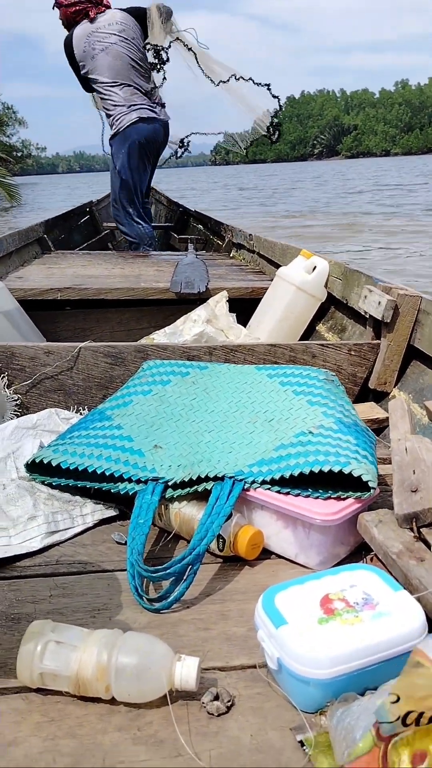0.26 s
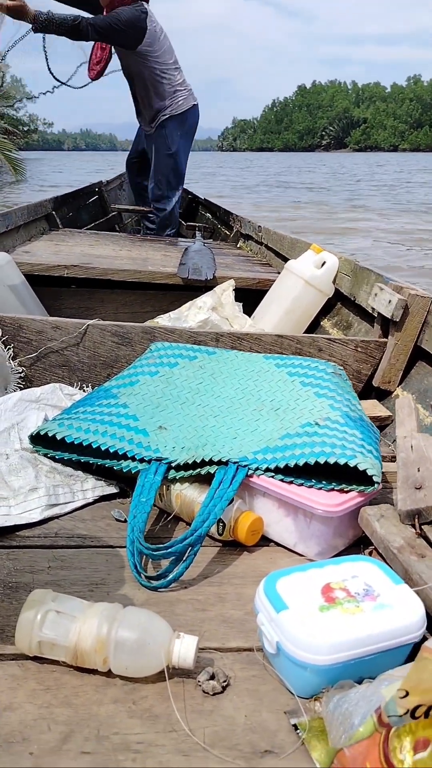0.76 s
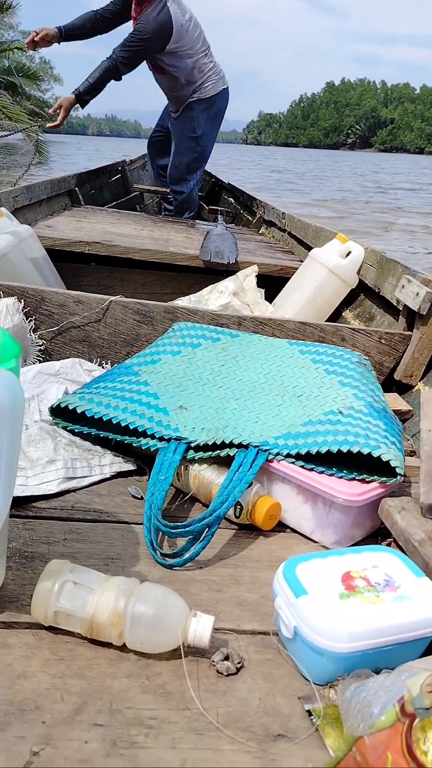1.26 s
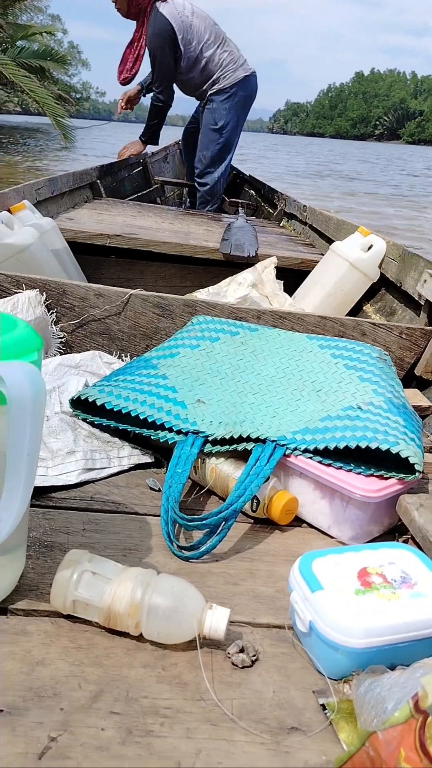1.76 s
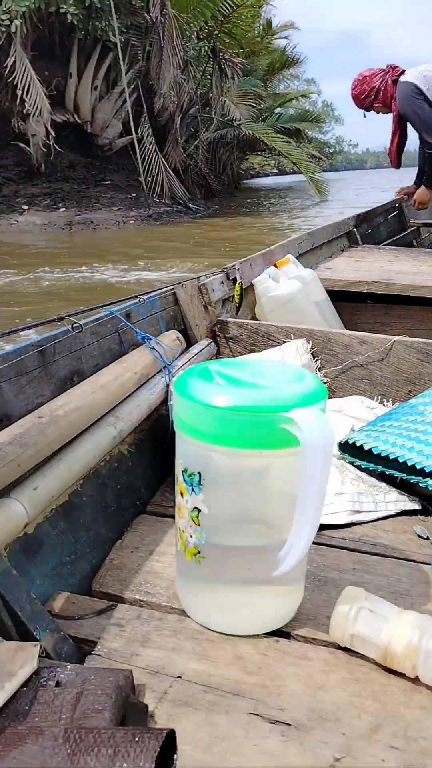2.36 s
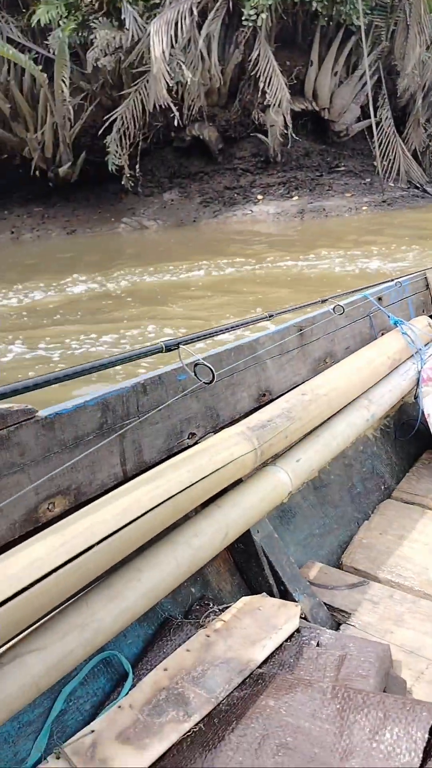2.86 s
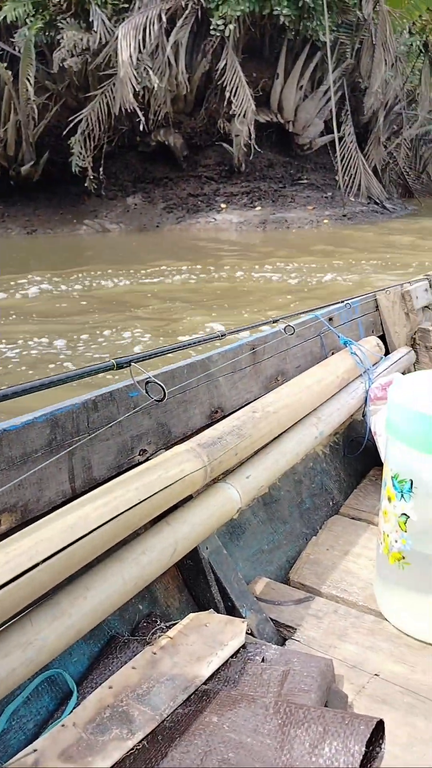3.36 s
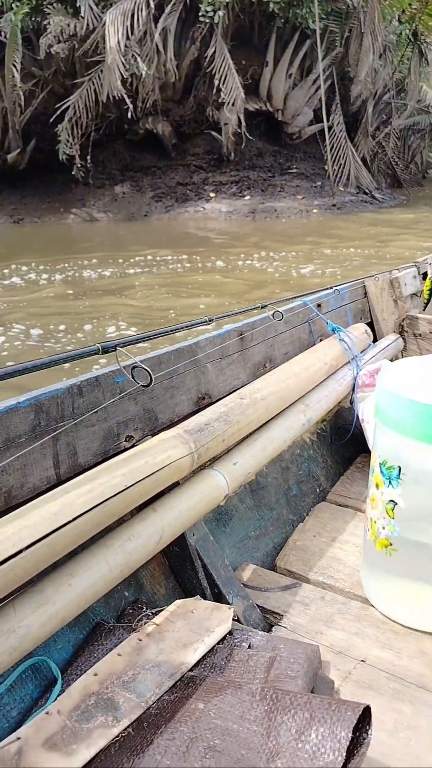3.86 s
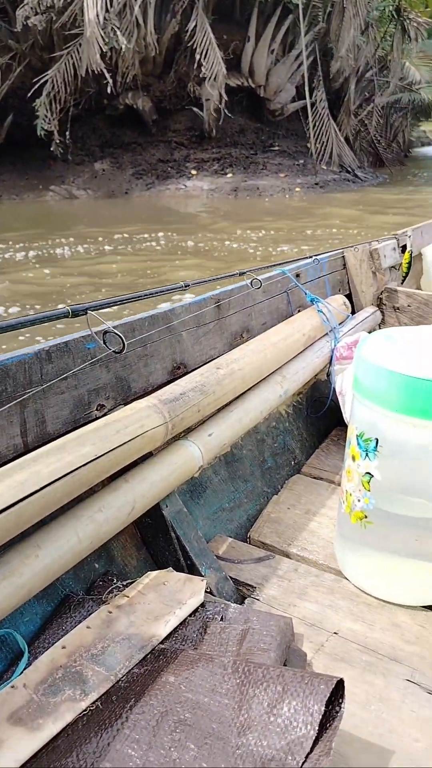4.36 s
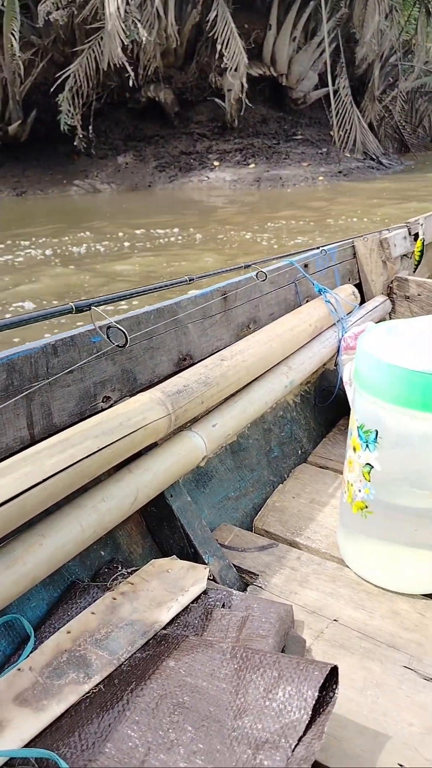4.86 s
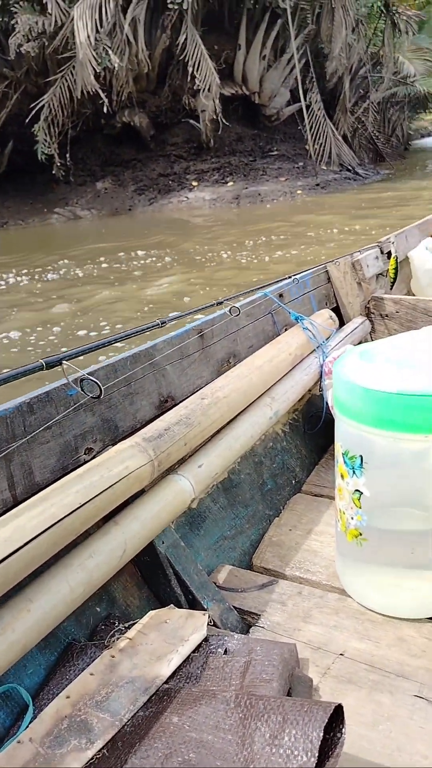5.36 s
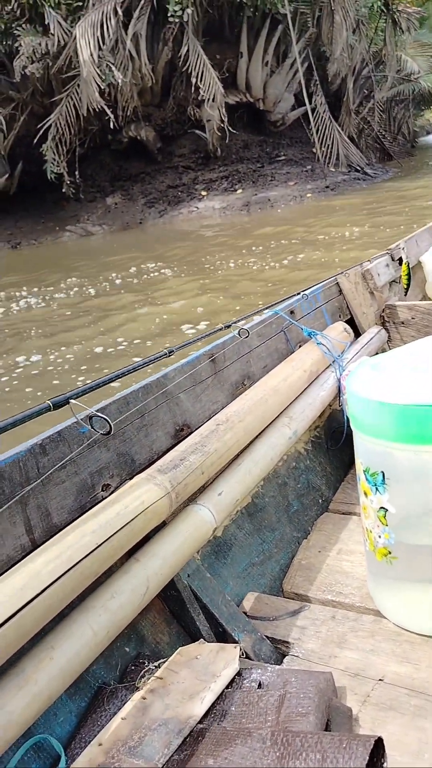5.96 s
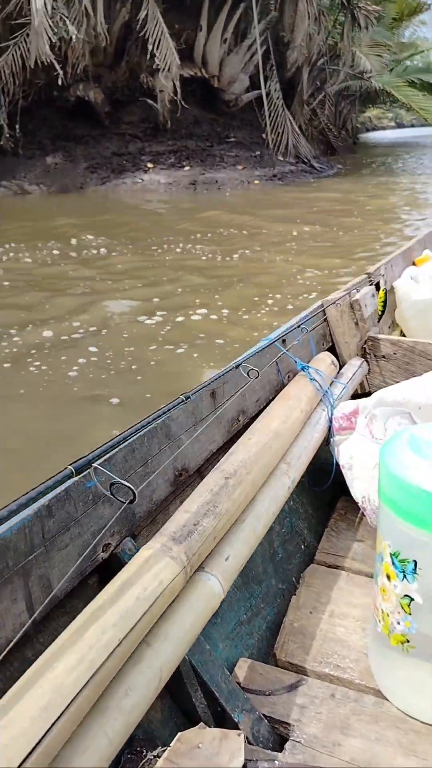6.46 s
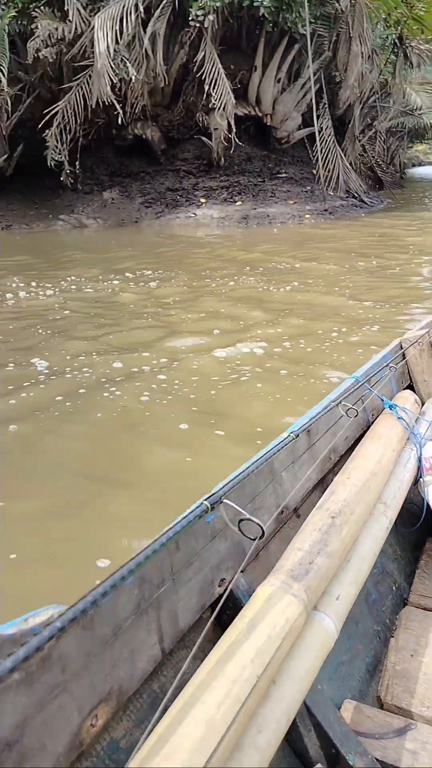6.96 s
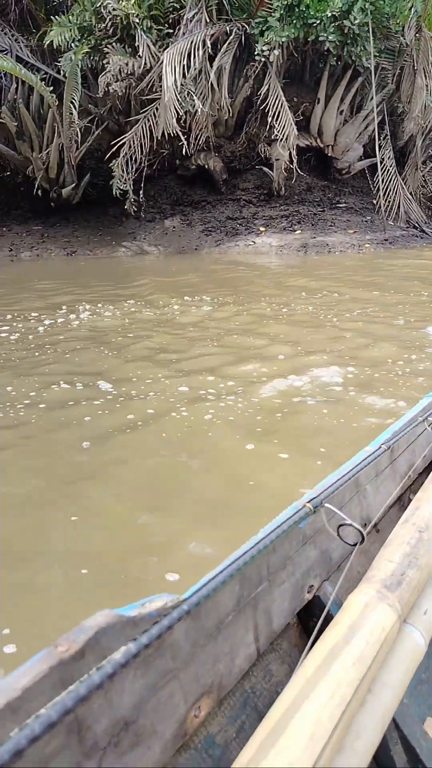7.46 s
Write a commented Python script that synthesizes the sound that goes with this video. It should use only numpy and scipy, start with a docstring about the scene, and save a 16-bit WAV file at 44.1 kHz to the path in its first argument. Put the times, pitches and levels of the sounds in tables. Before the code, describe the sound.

A weighted net clatters hard over a wooden boat, hisses through the air and splashes into the river, then wind buffets and gear knocks follow.

```python
"""Cast net thrown from a wooden boat

The net's weights clatter over the hull as ringing modes and noise bursts; mesh hisses through the air.
It lands in a splash of clicks and ringing bubbles, and large drops plop with a rising pitch.
Filtered, lumpy noise makes the gusts on the microphone, the hull's rumble, dragged gear and the quiet
river; gear knocks and ticks on the planks, and single puffs push at the microphone."""
import sys
import numpy as np
from scipy import signal
from scipy.fft import rfft, irfft, next_fast_len
from scipy.io import wavfile
from scipy.ndimage import uniform_filter1d

SR = 44100
rng = np.random.default_rng(int(sys.argv[2]) if len(sys.argv) > 2 else 0)


def unload_audio(sound):
    """Save the sound as a 16-bit wav file, at the path given as the first command line argument."""
    columns = np.transpose(np.atleast_2d(sound))
    # keep every value between -1 and 1, then stretch to whole-number steps
    steps = np.round(np.clip(columns, -1, 1) * 32767)
    wavfile.write(sys.argv[1], SR, steps.astype(np.int16))


N = 340452  # length [samples]

# Quiet of the river, distant water and leaves: (frequency [Hz], relative level [dB])
RIVER_SPECTRUM = [(200, 1.5), (400, -13), (1000, -9.5), (1350, -10), (1650, -14.5), (2500, -14),
                  (4000, -15.5), (5200, -20.5), (6500, -19.5), (8100, -17), (8700, -32), (11000, -31),
                  (12200, -25.5), (16000, -27)]
RIVER_DB = -62.5

# Gusts on the microphone: (top time [s], top level [dB], 20 dB rise [s], 20 dB fall [s])
GUST_SWELLS = [(0.0, -27, .1, 0.34), (0.3, -49, 0.12, 0.039), (0.48, -26.5, 0.024, 0.14),
               (0.8, -34.5, 0.29, 0.073), (1.2, -47, 0.19, 0.093), (3.5, -27.5, 0.33, 0.21),
               (3.809, -32, 0.54, 0.04), (4.509, -30, 0.13, 0.32), (4.82, -33.5, 0.085, 0.1),
               (5.424, -31, 0.27, 0.31), (5.965, -23.5, 0.069, 0.059), (6.25, -38.5, 0.069, 0.031),
               (6.84, -38, 0.23, 0.13), (7.42, -42, 0.24, 0.63), (7.67, -40, 0.057, 0.013)]
# Breeze between the gusts, before its flutter: (time [s], level [dB])
BREEZE_LEVEL = [(0, -56), (1.9, -50.5), (2.6, -56), (3.9, -98), (4.3, -49), (6.1, -63), (7.72, -55)]
# Colour of wind on the microphone: (frequency [Hz], relative level [dB])
GUST_SPECTRUM = [(8.8, -53), (15, 3), (59, -8), (79, -2), (168, -16), (219, -22), (258, -40), (880, -120)]
FLUTTER_PER_S, FLUTTER_DB = 2.79, 9.5  # the breeze comes and goes

# Hull rumbles as weight shifts in the boat: (top time [s], top level [dB], length [s])
LURCH_SWELLS = [(0.261, -41.5, 0.055), (0.57, -20, 0.2), (0.874, -42, 0.16), (3.444, -53, 0.51),
                (3.998, -47, 0.62), (4.483, -33.5, 0.27), (4.925, -39, 0.22), (5.606, -27.5, 0.13),
                (6.35, -41, 0.32), (6.485, -37, 0.077), (6.629, -41.5, 0.1), (6.795, -39.5, 0.056),
                (6.968, -40, 0.22), (7.601, -37.5, 0.023)]
# Colour of the hull's rumble: (frequency [Hz], relative level [dB])
RUMBLE_SPECTRUM = [(70, -42), (110, 5.5), (150, 0), (240, -3.5), (330, -11.5), (500, -18), (900, -44)]
LURCH_RISE, HUM_DB = 0.25, -55  # share of the length spent rising; the hum between lurches

# Hiss of the net swung back, then in flight: (time [s], level [dB])
SWING_LEVEL = [(0.2, -76), (0.44, -59.5), (0.75, -59), (1.32, -62.5)]
# Jerks of the net, each a burst of hiss: (top time [s], top level [dB])
NET_JOLTS = [(0.46, -47), (0.559, -45), (0.672, -44)]
# Colour of wet mesh in the air: (frequency [Hz], relative level [dB])
MESH_SPECTRUM = [(5000, -23.5), (8500, -23), (8990, -31), (9680, -15.5), (11000, -14.5), (13500, -17.5),
                 (15100, -21), (16000, -31)]
JOLT_RISE_S, JOLT_FALL_S = 0.079, 0.04  # each over 20 dB

# Tiny dry ticks of line and gear: (time [s], peak level [dB])
GEAR_TICKS = [(0.432, -47), (1.51, -41), (2.716, -48), (4.065, -48), (5.85, -45), (6.145, -49), (7.02, -50),
              (7.085, -43), (7.158, -54)]

# Gear dragged over the planks:
# (top time [s], dull level [dB], treble level [dB], 20 dB rise [s], 20 dB fall [s])
GEAR_DRAGS = [(0.475, -48.5, -79, 0.037, 0.99), (0.68, -36, -65, 0.14, 0.12),
              (4.451, -49.5, -69.5, 0.049, 0.27), (5.3, -53.5, -60.5, 0.26, 0.72),
              (6.35, -57.5, -100, 0.43, 0.13), (7.45, -57, -66, 1, 0.75)]
# Dull part of the dragging: (frequency [Hz], relative level [dB])
SCRAPE_SPECTRUM = [(180, -38), (300, 6.5), (432, 2), (504, -3.5), (652, -8), (692, -2), (1310, -8),
                   (1900, -12), (2300, -11), (4500, -23), (11000, -120)]
# Bright part of the dragging: (frequency [Hz], relative level [dB])
RUSTLE_SPECTRUM = [(2350, -27), (4000, 9), (5670, 0), (6440, 4.5), (7790, 8), (8850, -6), (10600, -3),
                   (12200, 1), (15100, -3), (16000, 1)]

# Blows on the boat:
# (time [s], plank level [dB], hull thud peak [dB], edge crack peak [dB], thud centre [Hz])
BLOWS = [(0.467, -11, -22, -25, 300), (0.522, -11.5, -24.5, -22.5, 335), (0.538, -11.5, -20, -18, 248),
         (0.549, -7.5, -2, -21, 293), (0.58, -16, -9.5, -26.5, 262), (0.615, -13.5, -14.5, -20.5, 265),
         (0.625, -37, -10.5, -51, 276), (0.666, -7.5, -22, -18.5, 270), (0.676, -24, -12.5, -26.5, 270),
         (0.718, -47, -20.5, -34, 176), (0.904, -19.5, -32.5, -31, 370), (1.021, -62, -77, -32.5, 196),
         (1.086, -38.5, -42.5, -45, 210), (1.125, -21, -33, -69, 190), (1.176, -59, -27.5, -51, 179),
         (2.136, -24, -34.5, -41, 183), (2.283, -39.5, -34, -60, 196), (2.649, -69, -28.5, -77, 168),
         (3.047, -37.5, -37, -41, 544), (3.959, -37.5, -37.5, -47, 310), (4.37, -51, -75.5, -40, 196),
         (4.412, -34.5, -51, -43, 206), (4.56, -37.5, -47.5, -42, 238), (4.586, -35.5, -33.5, -44, 214),
         (4.668, -27, -36.5, -34.5, 182), (4.696, -22.5, -29.5, -34.5, 390),
         (4.717, -35.5, -42, -41, 182.3), (4.774, -38.5, -36, -61, 394), (4.892, -66, -26.5, -81, 174),
         (5.058, -37.5, -32.5, -41.5, 495), (5.4, -28.5, -34.5, -37, 166), (5.456, -18, -35, -35.5, 200),
         (5.503, -35.5, -51, -50, 300), (5.574, -36, -29, -56, 298), (5.607, -30, -29.5, -42, 316),
         (5.631, -17.5, -32, -26.5, 198), (5.776, -38, -34.5, -46, 483), (5.987, -28.5, -32, -43, 320),
         (6.364, -34, -32, -39, 490), (6.408, -28.5, -35, -49, 206), (6.494, -40.5, -32.5, -65, 215),
         (6.601, -31, -43.5, -50, 159), (6.773, -44, -41, -68, 206), (6.945, -43, -34.5, -65, 242),
         (6.971, -38.5, -34.5, -45, 295), (7.391, -39, -45.5, -67, 370), (7.42, -31.5, -42, -33.5, 408),
         (7.457, -14.5, -27, -28, 544), (7.544, -66, -62, -43, 167), (7.586, -24, -36, -35, 387)]
# Ringing modes of the hull: (frequency [Hz], relative level [dB], 60 dB decay [s])
HULL_MODES = [(133.6, 1, 0.51), (174.9, 7, 0.14), (202.7, -1.5, 0.25), (282, 4, 0.1), (307, 3, 0.014),
              (385, 7, 0.086), (420, -11, 0.061), (523, 18.5, 0.021)]
# Ringing modes of the planks, before random shifts: (frequency [Hz], relative level [dB], 60 dB decay [s])
PLANK_MODES = [(887, -12.5, .055), (1110, -1, 0.0063), (1140, -12.5, 0.02), (1233, -13, 0.075),
               (1424, -21.5, 0.076), (1633, -23, 0.055), (1920, -19, 0.027), (2430, -20, 0.035)]
# Dense modes of loose boards: (frequency [Hz], relative level [dB])
BOARD_SPECTRUM = [(300, 13.5), (500, 3), (900, 4), (1400, 1), (1700, -15.5), (2400, -16)]
# Dense high modes of hard edges: (frequency [Hz], relative level [dB])
EDGE_SPECTRUM = [(1200, -33.5), (1600, -3), (1900, 6.5), (2450, 5), (3500, 0.5), (4600, -4), (5400, -10.5),
                 (7000, -9.5), (8200, -18), (9000, -18), (10500, -17.5), (15800, -24.5)]
CONTACT_S, CONTACT_S_PER_DB = .0115, .0003  # contact time of a -30 dB thud; heavier thuds press longer

# Single large drops, in the splash and dripping later: (time [s], level [dB], starting pitch [Hz])
DROPS = [(1.285, -42.5, 660), (1.389, -31, 590), (1.548, -35, 870), (1.607, -27, 1180), (1.712, -31, 1060),
         (1.778, -35, 950), (1.917, -36, 816), (2.03, -32, 1190), (2.054, -27, 2120), (2.074, -32, 850),
         (2.202, -44, 980), (2.242, -46, 940), (2.356, -42, 1120), (2.559, -45, 2070), (3.694, -42, 2200),
         (7.245, -42.5, 2800), (7.305, -43, 503), (7.553, -41, 1990), (7.672, -46, 1040)]
RING_CYCLES = 40  # a drop's bubble dies by 60 dB in this many cycles of its starting pitch

# Net landing on the water: (time [s], splash level [dB], fine spray above it [dB])
SPLASH_LEVEL = [(1.32, -58.5, 7.5), (1.4, -40.5, -14.5), (1.52, -39, -3), (1.55, -32, -16.5),
                (1.84, -43, -13), (2.14, -47.5, -13.5), (2.2, -56, -8.5), (2.75, -72, -6)]
# Body of the splash: (frequency [Hz], relative level [dB])
WATER_SPECTRUM = [(120, -49), (200, 3), (378, 5), (535, -7.5), (632, 2.5), (726, -6.5), (870, 2.5),
                  (1210, 0.5), (1560, -10), (2030, -4.5), (2830, -15), (3200, -14.5), (5500, -22.5),
                  (7150, -25), (12100, -120)]
# Fine spray: (frequency [Hz], relative level [dB])
SPRAY_SPECTRUM = [(2650, -13), (4500, -21.5), (5620, -28.5), (6700, -21), (7980, -23.5), (8640, -32.5),
                  (13200, -27.5), (15100, -29), (16000, -28)]

# Single strong puffs of wind on the microphone: (time [s], level [dB], pitch [Hz])
WIND_PUFFS = [(1.764, -28.5, 50), (1.861, -26.5, 50.3), (3.437, -27.5, 72), (3.495, -19.5, 93),
              (3.508, -25, 92), (3.523, -31, 65), (3.614, -16, 66), (3.641, -18.5, 70), (3.707, -18, 70),
              (3.814, -19, 33.9), (4.484, -26, 100), (4.513, -19, 66.4), (4.596, -16, 63),
              (4.618, -18.5, 66), (4.788, -15.5, 60), (5.407, -19, 65.4), (5.428, -17, 75),
              (5.438, -23, 71), (5.463, -21, 59.5), (5.76, -24, 64), (5.796, -17.5, 83), (5.826, -23, 56.4),
              (5.943, -24.5, 77.5), (6.625, -26, 79)]

BAND_LIMIT_HZ = 16000


def gain_of(db):
    """Turns decibels into a factor."""
    return 10 ** (np.asarray(db) / 20)


def evened(x):
    """Scales to rms 1."""
    return x / np.sqrt(np.mean(x ** 2) + 1e-20)


def peaked(x):
    """Scales to peak 1."""
    return x / abs(x).max()


def level(rows, column=1):
    """Gain along a curve, practically silent outside its span."""
    rows = np.asarray(rows)
    db = np.interp(np.arange(N) / SR, rows[:, 0], rows[:, column], left=-140, right=-140)
    return uniform_filter1d(gain_of(db), size=200)


def swells(tops, dbs, rises, falls):
    """Gain of swells that climb 20 dB in rise s to their top and drop 20 dB in fall s."""
    coarse = np.arange(0, N, 64)
    t = coarse / SR - np.asarray(tops)[:, None]
    dbs, rises, falls = (np.broadcast_to(v, len(t))[:, None] for v in (dbs, rises, falls))
    slope = np.where(t < 0, -t / np.maximum(rises, .01), t / np.maximum(falls, .01))
    return np.interp(np.arange(N), coarse, gain_of(dbs - 20 * slope).sum(axis=0))


def wander(per_s, depth_db):
    """Gain that drifts between random levels, per_s of them a second."""
    knots = rng.standard_normal(N // 20)
    drift = np.interp(np.arange(N) * per_s / SR, np.arange(len(knots)), knots)
    return gain_of(depth_db * drift)


def lumpy(per_s, depth_db):
    """Noise whose level wanders about per_s times a second."""
    return wander(per_s, depth_db) * rng.standard_normal(N)


def clicks(per_s, spread_db):
    """A random train of clicks, a few much larger than the rest."""
    size = gain_of(spread_db * np.minimum(rng.exponential(1, N), 4))
    sign = rng.choice([-1, 1], N)
    return size * sign * (rng.random(N) < per_s / SR)


def coloured(x, spectrum):
    """Filters x by a spectrum of (frequency [Hz], level [dB]) points, rms 1."""
    hz, db = np.transpose(spectrum)
    size = next_fast_len(len(x))
    bins = np.fft.rfftfreq(size, 1 / SR)
    shape = gain_of(np.interp(np.log(bins + 1), np.log(hz), db, left=-90, right=-90))
    return evened(irfft(rfft(x, size) * shape, size)[:len(x)])


def steadied(x, span_s):
    """Takes the slow chance swells out of x and keeps the quick lumps."""
    power = abs(uniform_filter1d(x ** 2, int(span_s * SR)))
    return evened(x / np.sqrt(power + 0.17))


def patchy(x, depth_db, size):
    """Gives x random bright and dull patches, size (bins, frames) large."""
    z = signal.stft(x, nperseg=512)[2]
    patches = uniform_filter1d(rng.standard_normal(z.shape), size=size[0], axis=0)
    patches = evened(uniform_filter1d(patches, size=size[1], axis=1))
    return evened(signal.istft(z * gain_of(depth_db * patches), nperseg=512)[1][:N])


def river():
    """Distant water and leaves: a hiss with faint drifting patches."""
    hiss = coloured(lumpy(25, 1.3), RIVER_SPECTRUM)
    return gain_of(RIVER_DB) * patchy(hiss, 1.9, size=(8, 14))


def gusts():
    """Lumpy pressure swings of wind at the microphone port, gusts over a fluttering breeze."""
    breeze = level(BREEZE_LEVEL) * wander(FLUTTER_PER_S, FLUTTER_DB)
    blowing = breeze + swells(*np.transpose(GUST_SWELLS))
    return steadied(coloured(lumpy(22, 5.5), GUST_SPECTRUM), .12) * blowing


def rumble():
    """The hull hums low under ripples and feet and swells as weight shifts."""
    tops, dbs, lengths = np.transpose(LURCH_SWELLS)
    lurching = swells(tops, dbs, LURCH_RISE * lengths, (1 - LURCH_RISE) * lengths)
    return steadied(coloured(lumpy(40, 4.0), RUMBLE_SPECTRUM), .12) * (gain_of(HUM_DB) + lurching)


def swing():
    """Wet mesh and line hiss as noise and shed droplets as clicks."""
    air = evened(lumpy(70, 3.0))
    droplets = evened(clicks(500, 6.0))
    jolts = swells(*np.transpose(NET_JOLTS), JOLT_RISE_S, JOLT_FALL_S)
    return coloured(air + .5 * droplets, MESH_SPECTRUM) * (level(SWING_LEVEL) + jolts)


def ticks():
    """Each tick is a bright burst a few milliseconds long."""
    out, t = np.zeros(N + SR), np.arange(1000) / SR
    for (s, db), grit in zip(GEAR_TICKS, rng.standard_normal((len(GEAR_TICKS), len(t) + 1))):
        bright = grit[1:] - .5 * grit[:-1]
        out[round(s * SR):][:len(t)] += gain_of(db) * peaked(bright * t * np.exp(-t / 0.0011))
    return out[:N]


def drags():
    """Uneven friction: clumped grains with a dull and a bright part."""
    grains = evened(lumpy(50, 3.0)) + .4 * evened(clicks(700, 2.5))
    dull = patchy(coloured(grains, SCRAPE_SPECTRUM), 4., size=(4, 4))
    bright = coloured(grains, RUSTLE_SPECTRUM)
    tops, dull_db, treble_db, rises, falls = np.transpose(GEAR_DRAGS)
    return dull * swells(tops, dull_db, rises, falls) + bright * swells(tops, treble_db, rises, falls)


def ring(modes, blow, detune, share=1):
    """The blow through a set of dying modes, each with its share, peak 1."""
    hz, db, t60 = np.transpose(modes)[..., None]
    t = np.arange(len(blow)) / SR
    pitch = hz * (1 + detune[:len(hz), None])
    tones = gain_of(db - 60 * t / t60) * np.sin(2 * np.pi * pitch * t)
    return peaked(signal.fftconvolve((share * tones).sum(axis=0), blow)[:len(t)])


def hull_thud(u, grit, thud_hz):
    """A short push rings the hull; the place of the blow favours modes near one pitch."""
    hull_hz = np.transpose(HULL_MODES)[0]
    near = np.exp(-(np.log(hull_hz / thud_hz) / .28) ** 2)[:, None]
    push = (1 + .5 * grit) * (abs(u - .22) < .04)
    return peaked(ring(HULL_MODES, push, .006 * grit, near) * (1 - np.exp(-(2.6 * u) ** 2)))


def plank_knock(t, grit, force, swell):
    """Gritty force rings the planks; board modes too dense to tell apart sound as dying noise."""
    boards = peaked(coloured(grit[::-1], BOARD_SPECTRUM) * swell * gain_of(-60 * t / 0.1))
    share = gain_of(5.2 * grit[-len(PLANK_MODES):, None])  # random balance of the modes
    return 0.39 * ring(PLANK_MODES, grit * force, 0.0403 * grit, share) + 0.47 * boards


def edge_crack(t, grit, force, swell):
    """Hard edges sound as spiky bright noise, at the contact and in a dying tail."""
    edge = coloured(grit * abs(grit), EDGE_SPECTRUM)
    return peaked(edge * (peaked(force) + 0.45 * swell * gain_of(-60 * t / 0.11)))


def knocks():
    """Each blow is a short gritty contact; hull, plank and hard edge sound in their own share."""
    out, t = np.zeros(N + SR), np.arange(SR // 4) / SR
    for row, grit in zip(BLOWS, rng.standard_normal((len(BLOWS), len(t)))):
        s, plank_db, thud_db, crack_db, thud_hz = row
        contact = CONTACT_S + CONTACT_S_PER_DB * (thud_db + 30)
        u = t / np.clip(contact, .006, .03)  # time in contact lengths
        force = u ** 2 * np.exp(-3.6 * u)
        swell = 1 - np.exp(-(1.9 * u) ** 2)
        sound = gain_of(plank_db) * plank_knock(t, grit, force, swell)
        sound += gain_of(crack_db) * edge_crack(t, grit, force, swell)
        sound += gain_of(thud_db) * hull_thud(u, grit, thud_hz)
        out[round((s - .2 * contact) * SR):][:len(sound)] += sound
    return out[:N]


def plops():
    """A large drop slaps the water and its bubble rings unevenly, rising in pitch."""
    out, t = np.zeros(N + SR), np.arange(4000) / SR
    for (s, db, hz), slap in zip(DROPS, rng.standard_normal((len(DROPS), len(t)))):
        u = hz * t  # time in cycles
        wobble = 1 + 0.38 * evened(uniform_filter1d(slap, size=60))
        bubble = wobble * np.sin(2 * np.pi * u * (1 + 0.0052 * u))
        tone = bubble + 0.23 * slap * np.exp(-t / 0.003)
        envelope = gain_of(db - 60 * u / RING_CYCLES) * (1 - np.exp(-u / 1.9))
        out[round(s * SR):][:len(t)] += envelope * tone
    return out[:N]


def bubble_cloud():
    """Trapped bubbles of many sizes ring briefly, each rising in pitch."""
    bubbles = np.zeros(N)
    for hz in np.geomspace(350, 4600, num=24):
        u = np.arange(int(30 * SR / hz)) * hz / SR  # time in cycles
        envelope = (1 - np.exp(-u)) * np.exp(-u / 5)
        grain = envelope * np.sin(2 * np.pi * u * (1 + .008 * u)) / np.sqrt(SR / hz)
        bubbles += signal.oaconvolve(clicks(110, 2.7), grain)[:N] * np.sqrt(hz)
    return evened(bubbles)


def splash():
    """Drops slap the surface and trap ringing bubbles; spray fizzes above."""
    slaps = evened(clicks(2500, 2.2)) + evened(lumpy(70, 4.))
    body = patchy(coloured(.85 * bubble_cloud() + slaps, WATER_SPECTRUM), 2.4, size=(5, 3))
    spray = coloured(slaps, SPRAY_SPECTRUM) * level(SPLASH_LEVEL, column=2)
    return (body + spray) * level(SPLASH_LEVEL)


def puffs():
    """A short push of pressure between two pulls, the later pull the deeper."""
    out, t = np.zeros(N), np.arange(-2000, 2000) / SR
    for s, db, hz in WIND_PUFFS:
        u = t * hz  # time in cycles
        pressure = np.cos(2 * np.pi * u) * np.exp(-((u - .15) / 0.51) ** 2)
        out[round((s + t[0]) * SR):][:len(t)] += gain_of(db) * pressure
    return out


def scene():
    """All sources at one microphone."""
    air_and_hull = river() + gusts() + rumble() + puffs()
    net_and_gear = swing() + ticks() + drags() + knocks()
    return (air_and_hull + net_and_gear + plops() + splash())[None]


def record(dry):
    """The loudest peaks are rounded off near full scale; then the band limit."""
    rounded = dry / (1 + (dry / .95) ** 6) ** (1 / 6)
    lowpass = signal.firwin(511, BAND_LIMIT_HZ, window=("kaiser", 9), fs=SR)
    return signal.oaconvolve(rounded, lowpass[None], "same")


dry = scene()
out = record(dry)
unload_audio(out)
```